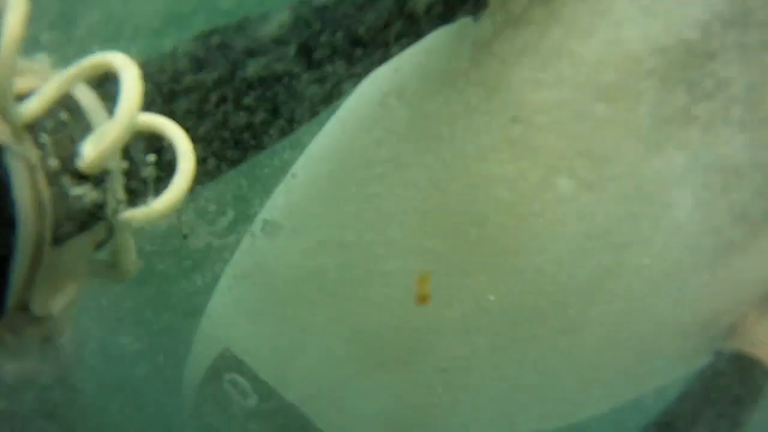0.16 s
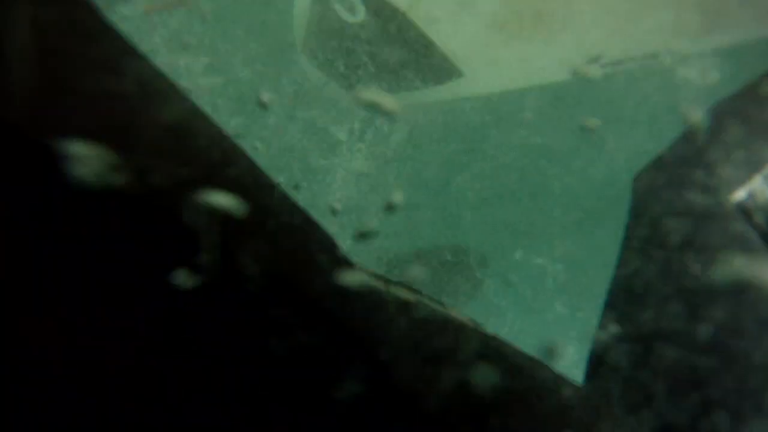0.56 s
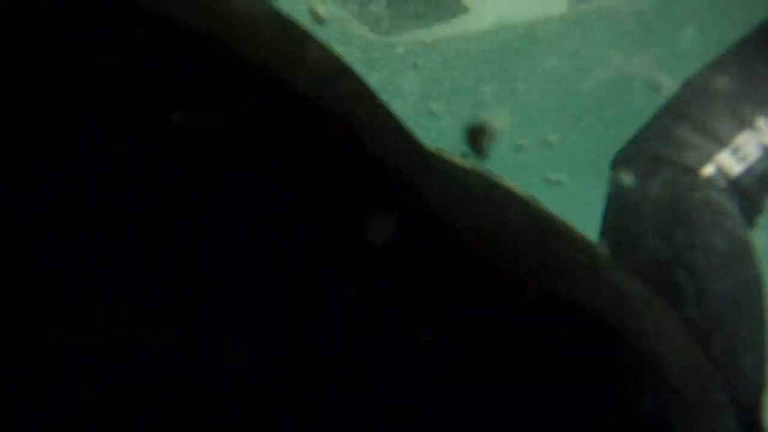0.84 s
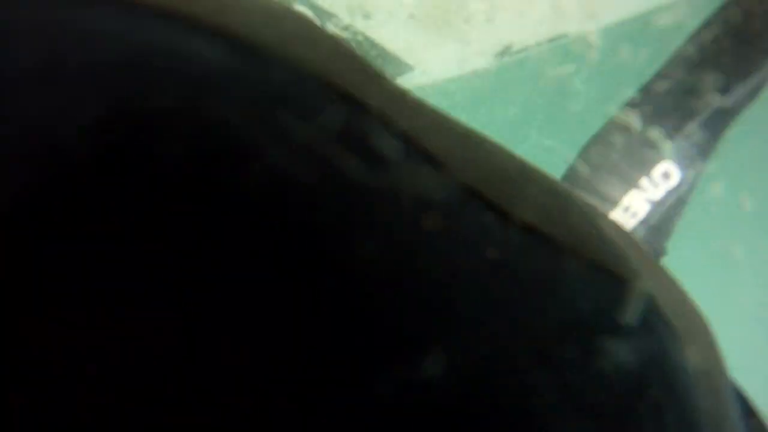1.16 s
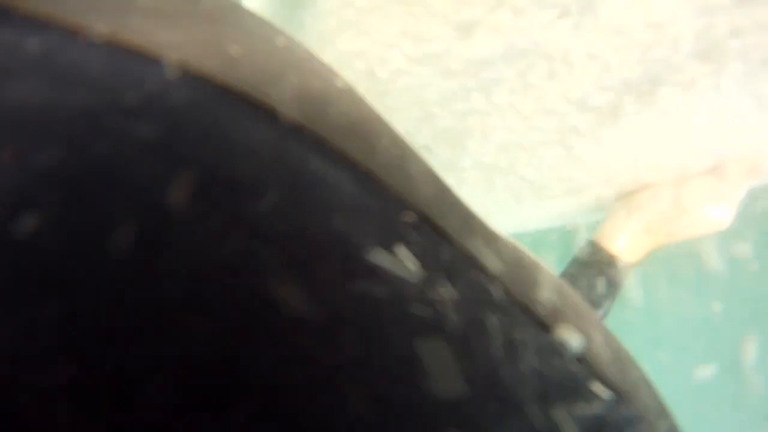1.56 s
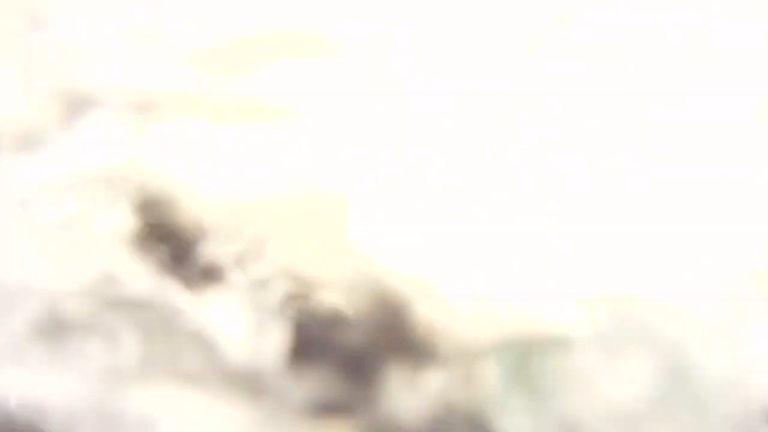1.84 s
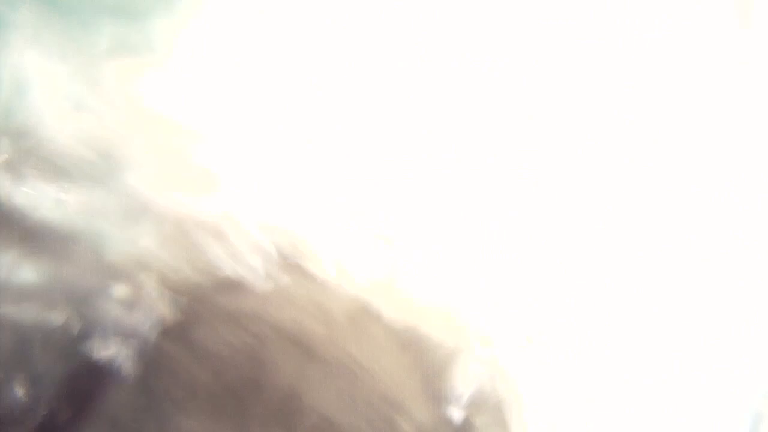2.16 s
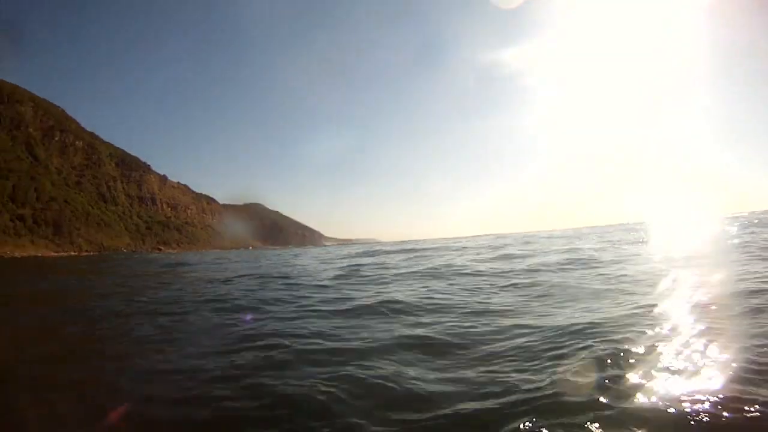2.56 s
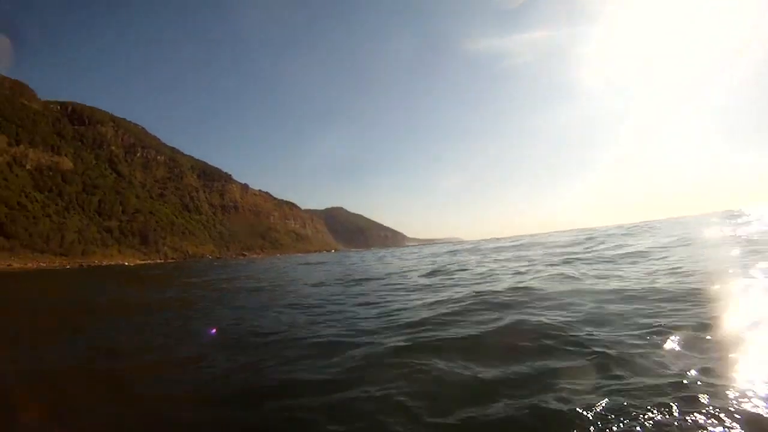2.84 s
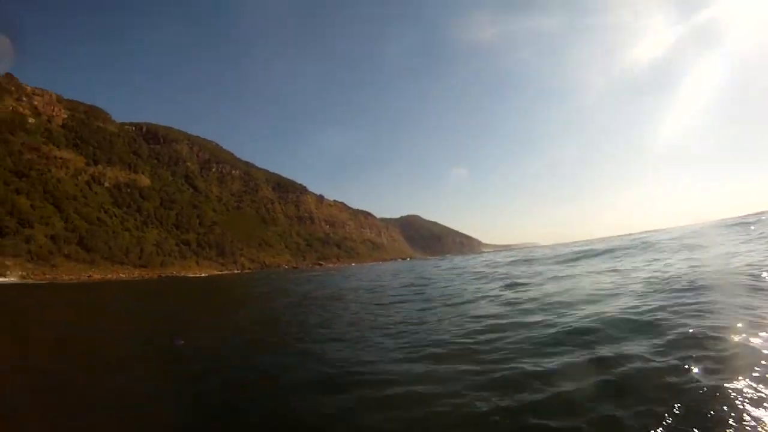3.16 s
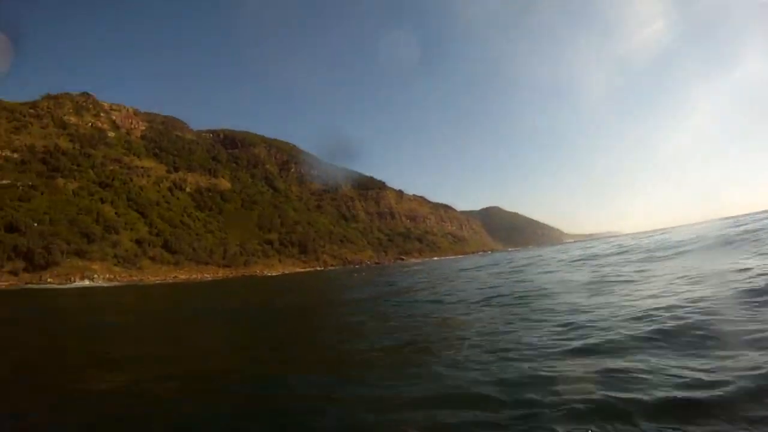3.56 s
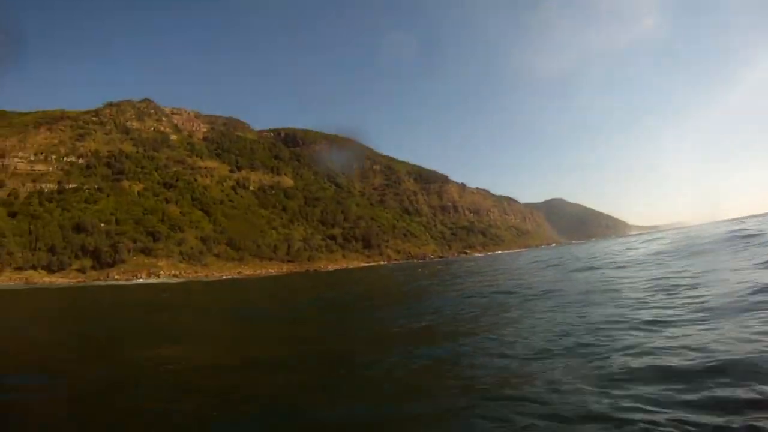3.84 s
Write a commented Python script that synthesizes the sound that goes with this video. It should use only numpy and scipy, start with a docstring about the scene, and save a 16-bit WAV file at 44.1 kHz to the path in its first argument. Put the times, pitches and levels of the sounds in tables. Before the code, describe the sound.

Underwater gurgling and hard hollow knocks on a camera case stop suddenly, leaving faint drips

```python
"""A waterproof housing is dragged through the sea beside a surfboard: from the start churning water
rattles its resonances, bubble clouds ring as rising sines and the flow buffets it as low noise.
Air pockets slap it (struck modes), big bubbles gulp, others glide in pitch and small ones snap.
After 2.4 s comes an abrupt cut to the calm surface: light air noise, faint drips and a trickle of
impulses tick on the case modes, and a wandering sine rumbles as the housing bobs."""
import sys
import numpy as np
from scipy import signal
from scipy.fft import rfft, irfft
from scipy.io import wavfile

SR = 44100
rng = np.random.default_rng(int(sys.argv[2]) if len(sys.argv) > 2 else 0)


def transcribe(u):
    """Save the signal u as a 16-bit wav file named by the first command-line argument.

    u: samples, shape (n,) or (channels, n), limited to [-1, 1]; the rate is SR.
    q: integer samples, one column per channel.
    """
    v = np.clip(np.atleast_2d(u).T, -1, 1)
    q = np.round(v * 32767).astype(np.int16)
    wavfile.write(sys.argv[1], SR, q)


N = 176400
T = np.arange(N) / SR


def from_db(db):
    """Level law: 20 dB is a factor of ten in amplitude."""
    return 10 ** (np.asarray(db) / 20)


def rms_one(x):
    """Power normalisation: the mean square becomes one."""
    return x / np.sqrt(np.mean(x ** 2) + 1e-20)


def peak_one(x):
    """Peak normalisation: the largest excursion becomes one."""
    return x / (np.abs(x).max() + 1e-20)


def add(out, start_s, sound):
    """Superposition: pressures add from a start time onward."""
    i = max(int(start_s * SR), 0)
    out[i:i + len(sound)] += sound[:N - i]


def levels(rows):
    """Amplitude envelopes: each level column, interpolated in dB over time, becomes a gain."""
    times, *columns = np.transpose(rows)
    return [from_db(np.interp(T, times, column)) for column in columns]


def gain_at(colour, hz):
    """Spectral envelope: level interpolated along log frequency."""
    points_hz, db = np.transpose(colour)
    return from_db(np.interp(np.log(hz + 1e-3), np.log(points_hz), db))


def noise(colour):
    """Spectral shaping of white noise, rolled off around and above the last point."""
    hz = np.fft.rfftfreq(N, 1 / SR)
    roll_off = 1 + (hz / colour[-1][0] / 2) ** 2
    spectrum = rfft(rng.standard_normal(N)) * gain_at(colour, hz) / roll_off
    return rms_one(irfft(spectrum, N))


def drift(rate):
    """Random modulation: noise through two equal low-pass poles at rate [Hz], with unit rms."""
    r = np.exp(-80 * np.pi * rate / SR)  # computed on every 40th sample
    white = rng.standard_normal(N // 40 + 2002)
    slow = signal.lfilter([1], [1, -2 * r, r * r], white)[2000:]  # the filter has settled
    return np.interp(np.arange(N) / 40, np.arange(len(slow)), rms_one(slow))


def resonate(x, hz, width):
    """Damped resonance: a pole pair whose bandwidth sets the decay, with a peak gain near one."""
    r = np.exp(-np.pi * width / SR)
    zeros = np.array([1, 0, -1]) * (1 - r * r) / 2
    poles = [1, -2 * r * np.cos(2 * np.pi * hz / SR), r * r]
    return signal.lfilter(zeros, poles, x + 1e-18)


def body(x, modes):
    """Modal superposition: parallel resonances of alternating sign."""
    return sum((-1) ** k * from_db(db) * resonate(x, hz, width)
               for k, (hz, width, db) in enumerate(modes))


def clicks(per_s, spread_db):
    """Poisson-like impacts: random impulses, mostly small and a few large."""
    size = from_db(spread_db * np.minimum(rng.exponential(1, N), 4.5))
    return (rng.random(N) < per_s / SR) * size * rng.choice([-1, 1], N)


SPATTER_PER_S, SPATTER_SIZE, IMPACT = 2700, 0.41, 0.86


def spatter(length_s):
    """Multiple impact: a first impulse, then smaller ones under a Gaussian decay (1/e at length_s)."""
    t = T[:SR // 10]
    sign = rng.choice([-1, 1], len(t))
    struck = rng.random(len(t)) < SPATTER_PER_S / SR
    run = SPATTER_SIZE * sign * struck * np.exp(-(t / length_s) ** 2)
    return run + IMPACT * (t == 0)


def soften(x):
    """Contact compliance: water cushions a blow, so its force loses treble."""
    return signal.sosfilt(signal.butter(2, 1900, fs=SR, output="sos"), x + 1e-18)


# vigour of the flow: (time [s], housing rattle [dB], low gurgle [dB], babble [dB], fine fizz [dB])
FLOW_VIGOUR = [(0,-49,-22.5,-30,-48),(.09,-36.5,-30.5,-33,-40.5),(.16,-49.5,-41.5,-38,-73),(.26,-37,-34.5,-35.5,-42.5),(.32,-44,-37,-38.5,-56),(.49,-33,-33.5,-37.5,-58),(.6,-25,-35,-39,-35.5),(.73,-21,-35.5,-26,-29.5),(.9,-22,-31.5,-42.5,-29.5),(1.05,-26,-33.5,-62,-30),(1.23,-22.5,-30,-34,-24.5),(1.39,-24.5,-39.5,-33,-28),(1.48,-29.5,-24.5,-50.5,-35.5),(1.58,-38.5,-43.5,-42,-79),(1.68,-42,-38.5,-23.5,-66),(1.78,-30.5,-36,-26,-41.5),(1.9,-29,-34.5,-27,-38.5),(2.05,-34,-46.5,-37,-52),(2.16,-28.5,-35,-32.5,-31.5),(2.22,-30,-44,-37,-38.5),(2.32,-30.5,-53,-29,-39.5),(2.44,-26.5,-39,-28,-36)]
# modes of the housing under water: (frequency [Hz], width [Hz], relative level [dB])
HOUSING_MODES = [(680,210,-11),(1030,203,0.5),(1141,303,-3),(1670,170,-13.5),(1745,260,-12.5)]
RATTLE_PER_S, RATTLE_SPREAD_DB, RATTLE_DB = 900, 2, -0.5
RATTLE_SURGE_DB, RATTLE_SURGE_HZ = 2, 55


def rattle():
    """Forced modal vibration: random softened impacts of the flow excite the housing modes."""
    hits = clicks(RATTLE_PER_S, RATTLE_SPREAD_DB)
    surge = from_db(RATTLE_SURGE_DB * drift(RATTLE_SURGE_HZ))
    ringing = rms_one(body(soften(hits * surge), HOUSING_MODES))
    return from_db(RATTLE_DB) * levels(FLOW_VIGOUR)[0] * ringing


BUBBLE_SPREAD_DB, BUBBLE_TILT_DB_PER_OCT = 4.5, 3.5
BUBBLE_RISE, BUBBLE_ATTACK_CYCLES = 0.18, 0.7  # fractional rise over the 60 dB decay


def cloud(low, high, per_s, cycles):
    """Bubble resonance: bubbles born at random, each a dying sine that rises in pitch."""
    out = np.zeros(N)
    for when, place, size, life in rng.random((int(per_s * N / SR), 4)):
        hz = low * (high / low) ** place
        span = cycles * (.5 + life)  # starting-pitch cycles to fall 60 dB
        turn = T[:int(span / hz * SR)] * hz
        size_db = BUBBLE_SPREAD_DB * min(-np.log(1 - size), 4)
        db = size_db + BUBBLE_TILT_DB_PER_OCT * np.log2(hz / low)
        envelope = (1 - np.exp(-turn / BUBBLE_ATTACK_CYCLES)) * from_db(db - 60 * turn / span)
        phase = 2 * np.pi * turn * (1 + BUBBLE_RISE * turn / span / 2)
        add(out, when * N / SR, envelope * np.sin(phase))
    return rms_one(out)


# gurgle, babble and fizz: (lowest starting pitch [Hz], highest starting pitch [Hz], bubbles [1/s],
# mean decay to -60 dB [cycles], level relative to the flow [dB])
BUBBLE_CLOUDS = [(111.5,420,300,14,3.5),(409,1100,200,16,2),(1350,2082,360,16,-1)]


def bubble_clouds():
    """Incoherent summation: clouds of large, middling and fine bubbles follow the flow."""
    out = np.zeros(N)
    for gain, (low, high, per_s, cycles, db) in zip(levels(FLOW_VIGOUR)[1:], BUBBLE_CLOUDS):
        out += gain * from_db(db) * cloud(low, high, per_s, cycles)
    return out


# hum of air trapped against the case: (time [s], level [dB])
POCKET_LEVEL = [(0,-27),(.25,-50.5),(.75,-36),(.9,-29.5),(1.62,-30),(1.68,-42),(1.85,-34.5),(2.02,-39.5),(2.44,-40)]


def pocket_hum():
    """Cavity resonance: noise through two equal resonances in series hums near one pitch."""
    hz, width = 331.1, 77  # width of each resonance [Hz]
    once = resonate(rng.standard_normal(N), hz, width)
    return levels(POCKET_LEVEL)[0] * rms_one(resonate(once, hz, width))


# air pockets slapping the housing:
# (time [s], peak level before SLAP_DB [dB], ring [Hz], spatter 1/e time [s])
AIR_SLAPS = [(.009,-14.5,680,0.02),(0.061,-15.5,510,0.011),(.296,-13,974,0.016),(0.323,-15,840,0.01),(0.375,-21.5,1030,0.014),(0.441,-8,1140,0.0048),(0.466,-18,1065,0.0065),(0.491,-19.5,1030,0.003),(0.521,-8.5,1138,0.018),(0.59,-6.5,947,0.0021),(.635,-10.5,980,0.0021),(0.695,-8.5,1056,0.013),(.714,0,1112,0.012),(0.727,-13,1020,.012),(.849,-2.5,1055,.0055),(.921,-7,920,0.0078),(0.942,-2.5,1055,.011),(.96,-6,1093,0.0079),(1,-11.5,1000,0.015),(1.129,-8.5,970,0.022),(1.149,-3,1140,0.012),(1.316,-3,1063,0.0062),(1.658,-8,774,0.01),(1.672,-12.5,1090,0.016),(1.713,-12.5,867,.008),(1.892,-9.5,1146,0.018),(1.962,-11,1172,0.0097),(2.003,-11,1030,0.009),(2.083,-11.5,833,0.0056),(2.131,-9.5,1147,0.0064),(2.149,-9.5,1035,.0064),(2.184,-14.5,1140,0.0042),(2.327,-12.5,1080,0.0075),(2.365,-13.5,544,.022),(2.41,-5,1143,.013)]
SLAP_WIDTH_HZ, SLAP_BODY_DB, SLAP_DB = 104, -11, 0.5


def slaps():
    """Impact excitation: each air pocket lands softly, rings at its own pitch and shakes the housing."""
    out = np.zeros(N)
    for start_s, db, hz, length_s in AIR_SLAPS:
        push = soften(spatter(length_s))
        ring = peak_one(resonate(push, hz, SLAP_WIDTH_HZ))
        shake = from_db(SLAP_BODY_DB) * peak_one(body(push, HOUSING_MODES))
        add(out, start_s, from_db(db + SLAP_DB) * peak_one(ring - shake))
    return out


# single bubbles pinching off:
# (time [s], peak level [dB], starting pitch before wobble [Hz], swell [s], 60 dB decay time [s])
BIG_BUBBLES = [(0.073,-14,195,0.0042,0.13),(.341,-2,94,.006,0.028),(.443,-12,41.5,0.0031,.09),(.709,-5.5,652,0.0045,0.06),(1.226,-8,186,0.003,0.082),(1.229,-15,690,0.0048,0.078),(1.28,-9.5,180,0.0021,0.072),(1.323,-13.5,172.5,0.0047,0.16),(1.456,-8,160,0.023,0.15),(1.745,-6,691,0.0076,0.075),(1.744,-8,369,.001,0.036),(1.726,-10,33.9,0.018,0.15),(1.798,-7,235,0.0024,0.023),(1.8401,5,1657,0.0013,.018),(1.842,-2,370,.002,.025)]
GULP_RISE_PER_S, GULP_WOBBLE, GULP_WOBBLE_HZ = .4, .035, 44  # rise and wobble are fractions of pitch


def gulps():
    """Free bubble oscillation: a swell, then exponential decay with a wobbling, slightly rising pitch."""
    out, t = np.zeros(N), T[:SR // 4]
    for start_s, db, hz, swell_s, t60 in BIG_BUBBLES:
        wobble = GULP_WOBBLE * drift(GULP_WOBBLE_HZ)[:len(t)]
        pitch = hz * (1 + GULP_RISE_PER_S * t + wobble)
        decay = from_db(db - 60 * np.maximum(t - swell_s, 0) / t60)
        envelope = np.minimum(t / swell_s, 1) * decay
        add(out, start_s, envelope * np.sin(2 * np.pi * np.cumsum(pitch) / SR))
    return out


# bubbles sliding along the case:
# (time [s], peak level before flutter [dB], start pitch [Hz], end pitch [Hz], length [s])
SLIDING_BUBBLES = [(0.14,-32.5,650,740,0.09),(0.32,-20,1050,993,0.038),(1.485,-12,123,109,0.062),(1.659,-20.5,705,664,0.044),(1.697,-16.5,1206,1030,0.033),(1.692,-30.5,552,607,0.087),(2.287,-25,1900,1750,0.025),(2.316,-22,1414,1576,0.017)]
GLIDE_FLUTTER_DB, GLIDE_FLUTTER_HZ = 3.5, 170


def glides():
    """Frequency modulation: squeezed bubbles sing briefly and unevenly while their pitch slides."""
    out = np.zeros(N)
    for start_s, db, start_hz, end_hz, length_s in SLIDING_BUBBLES:
        along = T[T < length_s] / length_s
        pitch = start_hz + (end_hz - start_hz) * along
        flutter_db = GLIDE_FLUTTER_DB * drift(GLIDE_FLUTTER_HZ)[:len(along)]
        envelope = from_db(db + flutter_db) * np.sin(np.pi * along)
        add(out, start_s, envelope * np.sin(2 * np.pi * np.cumsum(pitch) / SR))
    return out


# small bubbles bursting on the case: (time [s], peak level [dB], ring [Hz])
BURSTS = [(0.304,-21.5,1800),(0.381,-19.5,2100),(0.448,-27,1900),(.657,-19,2350),(.697,-11.5,1700),(.922,-13,2300),(1.359,-13.5,1800),(1.801,-18,1750),(1.824,-22.5,1900),(1.94,-21,2600),(2.141,-21.5,2200),(2.165,-17.5,2350),(2.265,-24,2500)]
SNAP_LENGTH_S, SNAP_WIDTH_HZ = 0.0083, 660  # 1/e time of the spatter, width of each resonance


def snaps():
    """Heavily damped resonance: small bubbles burst as short bright cracks."""
    out = np.zeros(N)
    for start_s, db, hz in BURSTS:
        once = resonate(spatter(SNAP_LENGTH_S), hz, SNAP_WIDTH_HZ)
        add(out, start_s, from_db(db) * peak_one(resonate(once, hz, SNAP_WIDTH_HZ)))
    return out


# slow pressure swings on the housing: (time [s], level [dB])
BUFFET_LEVEL = [(0,-30.5),(.2,-32),(.36,-25.5),(.65,-23.5),(.85,-29.5),(1.05,-19.5),(1.25,-29),(1.5,-22.5),(1.62,-30.5),(1.8,-24.5),(2.04,-38),(2.17,-35.5),(2.44,-33.5)]
# their spectrum: (frequency [Hz], relative level [dB])
BUFFET_SPECTRUM = [(15,-14),(25,2.5),(38,-2.5),(65,-0.5),(100,-10.5),(160,-19),(300,-44.5)]


def buffeting():
    """Flow noise: pressure swings on the housing are low-frequency shaped noise."""
    return levels(BUFFET_LEVEL)[0] * noise(BUFFET_SPECTRUM)


# drips on the case: (time [s], peak level before DRIP_DB [dB], ring [Hz])
DRIP_HITS = [(2.554,-42,2323),(2.611,-38,2430),(2.654,-45.5,3700),(2.686,-41.5,2050),(2.708,-40.5,2400),(3.083,-43,1644),(3.292,-35.5,2475),(3.421,-37,2170),(3.436,-34,2400),(3.513,-45,3580),(3.684,-40.5,2490),(3.942,-46,2400)]
# modes of the case at the surface: (frequency [Hz], width [Hz], relative level [dB])
CASE_MODES = [(1620,100,-10.5),(2400,170,-5),(3310,230,-11),(4900,410,-17.5)]
DRIP_LENGTH_S, DRIP_WIDTH_HZ = 0.0059, 123  # 1/e time of the spatter, width of the drip's own ring
DRIP_BODY_DB, DRIP_DB = -7.5, -3.5


def drips():
    """Impact excitation: each drip rings at its own pitch and, by a second spatter, in the case modes."""
    out = np.zeros(N)
    for start_s, db, hz in DRIP_HITS:
        ring = peak_one(resonate(spatter(DRIP_LENGTH_S), hz, DRIP_WIDTH_HZ))
        case = from_db(DRIP_BODY_DB) * peak_one(body(spatter(DRIP_LENGTH_S), CASE_MODES))
        add(out, start_s, from_db(db + DRIP_DB) * peak_one(ring + case))
    return out


# water trickling off the case: (time [s], level [dB])
TRICKLE_LEVEL = [(2.5,-62),(2.65,-58.5),(2.78,-70),(3.0,-76),(3.43,-61.5),(3.6,-68),(4,-76.5)]
TRICKLE_PER_S, TRICKLE_SPREAD_DB = 240, 3


def trickle():
    """Forced modal vibration: a stream of tiny random impacts excites the case modes."""
    ringing = body(clicks(TRICKLE_PER_S, TRICKLE_SPREAD_DB), CASE_MODES)
    return levels(TRICKLE_LEVEL)[0] * rms_one(ringing)


# spectrum of the light air: (frequency [Hz], relative level [dB])
AIR_SPECTRUM = [(15,-1),(55,-16.5),(130,-16.5),(300,-19.5),(800,-25),(2500,-28.5),(5500,-33)]
AIR_DB = -58


def air():
    """Stationary noise: light air is a steady, low-weighted hush."""
    return from_db(AIR_DB) * noise(AIR_SPECTRUM)


# rumble of the bobbing housing: (time [s], level [dB])
BOBBING_LEVEL = [(2.68,-62),(2.77,-47),(2.9,-60),(3.11,-56),(3.18,-45.5),(3.23,-58),(3.5,-61),(3.58,-50),(3.8,-57),(3.92,-59.5),(3.98,-49.5)]
BOBBING_HZ, BOBBING_WANDER, BOBBING_WANDER_HZ = 39.5, 0.55, 14  # wander: rms of log pitch


def bobbing():
    """Random frequency modulation: a smooth rumble wanders in pitch and swells with the bobbing."""
    pitch = BOBBING_HZ * np.exp(BOBBING_WANDER * drift(BOBBING_WANDER_HZ))
    return levels(BOBBING_LEVEL)[0] * rms_one(np.sin(2 * np.pi * np.cumsum(pitch) / SR))


CUT_S, CUT_FADE_S = 2.445, 0.0097


def scene():
    """Linear superposition: the underwater sources fade out just before the cut, then the surface."""
    churn = rattle() + bubble_clouds() + pocket_hum()
    under = churn + slaps() + gulps() + glides() + snaps() + buffeting()
    surface = drips() + trickle() + air() + bobbing()
    submerged = np.clip((CUT_S - T) / CUT_FADE_S, 0, 1)
    return (submerged * under + (T >= CUT_S) * surface)[None]


def low_pass(x, hz):
    """Band limitation: a very steep zero-phase low-pass."""
    return signal.sosfiltfilt(signal.ellip(8, .1, 50, hz, fs=SR, output="sos"), x)


def hold(x, rate):
    """Zero-order hold: coarse sampling in steps mirrors the sound into the treble as images."""
    x = signal.sosfiltfilt(signal.butter(12, .497 * rate, fs=SR, output="sos"), x)
    steps = np.repeat(signal.resample_poly(x, rate, SR), 8)
    return signal.resample_poly(steps, SR, 8 * rate)[:N]


UNDER_HOLD_HZ, SURFACE_HOLD_HZ = 6000, 12000  # sampling rates
UNDER_CUTOFF_HZ, OVERLOAD_CUTOFF_HZ, CUTOFF_HZ = 7580, 11200, 15400
OVERLOAD, FULL_SCALE = 1.15, .88


def record(dry):
    """Saturation and imaging: coarse sampling, an octave coarser under water, where hard knocks clip."""
    x = OVERLOAD * np.tanh(dry[0] / OVERLOAD)
    under = low_pass(hold(x * (T < CUT_S), UNDER_HOLD_HZ), UNDER_CUTOFF_HZ)
    under = low_pass(np.clip(under, -FULL_SCALE, FULL_SCALE), OVERLOAD_CUTOFF_HZ)
    surface = hold(x * (T >= CUT_S), SURFACE_HOLD_HZ)
    return low_pass(under + surface, CUTOFF_HZ)[None]


dry = scene()
out = record(dry)
transcribe(out)
```